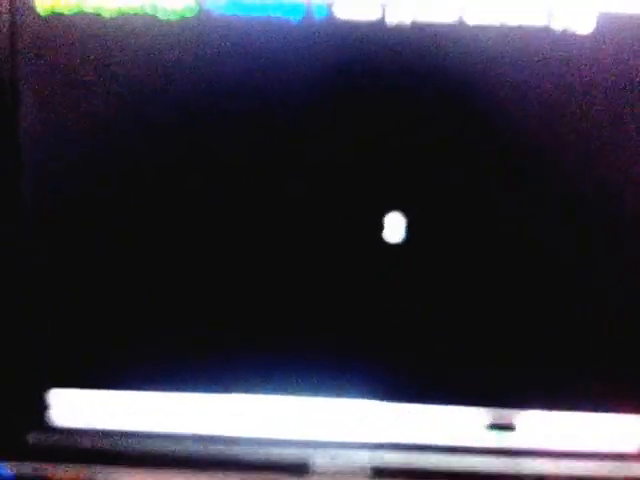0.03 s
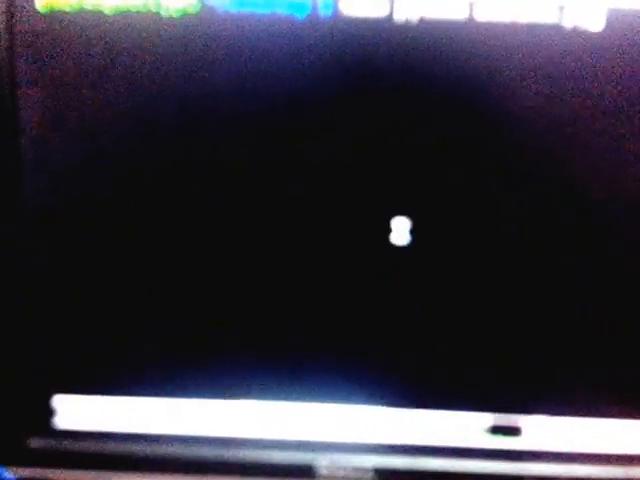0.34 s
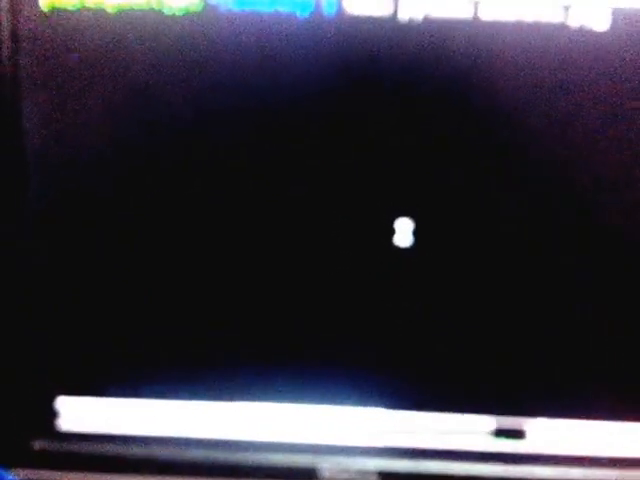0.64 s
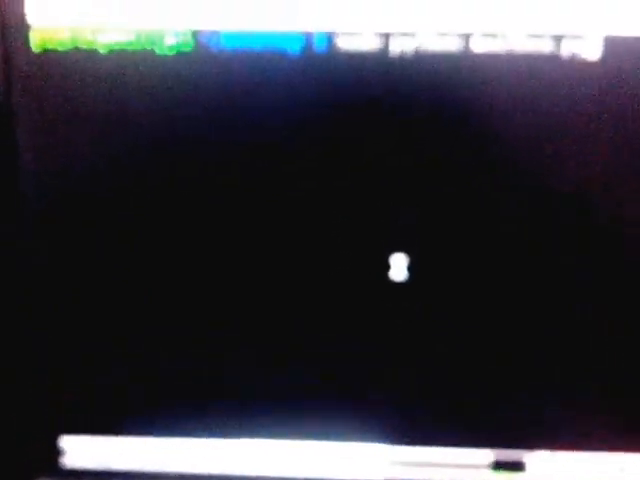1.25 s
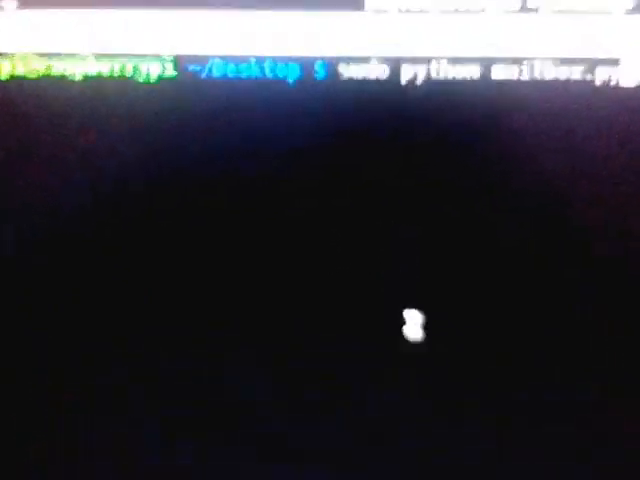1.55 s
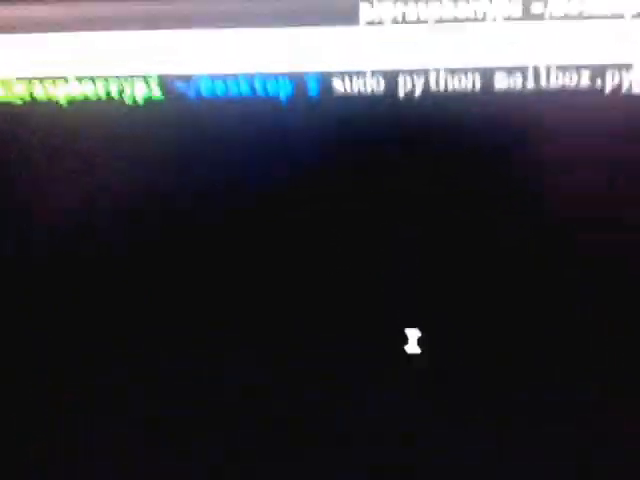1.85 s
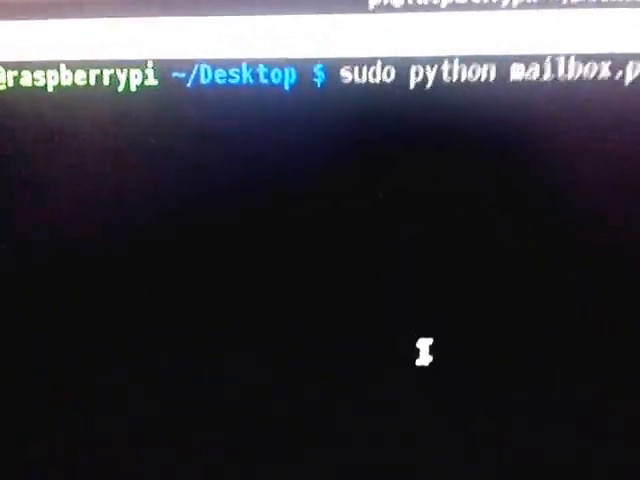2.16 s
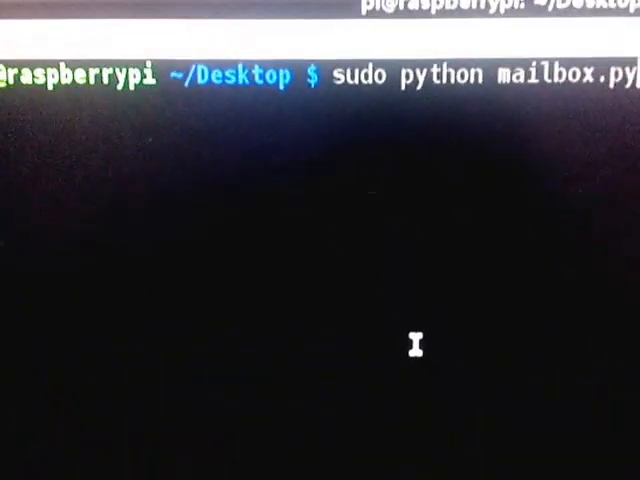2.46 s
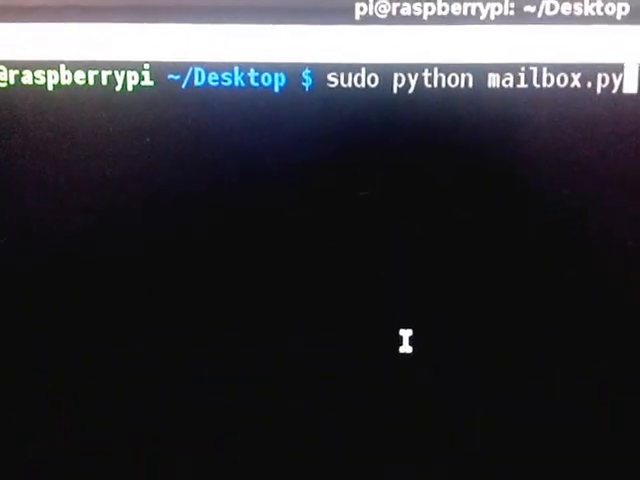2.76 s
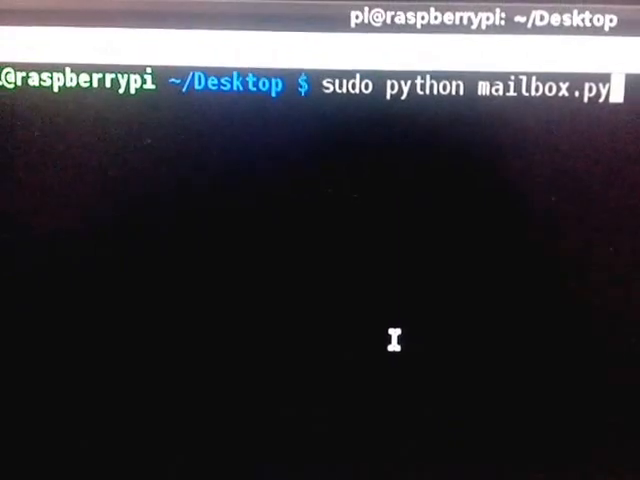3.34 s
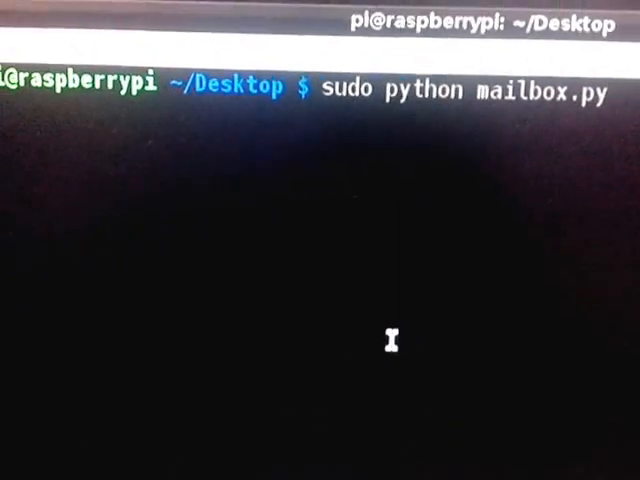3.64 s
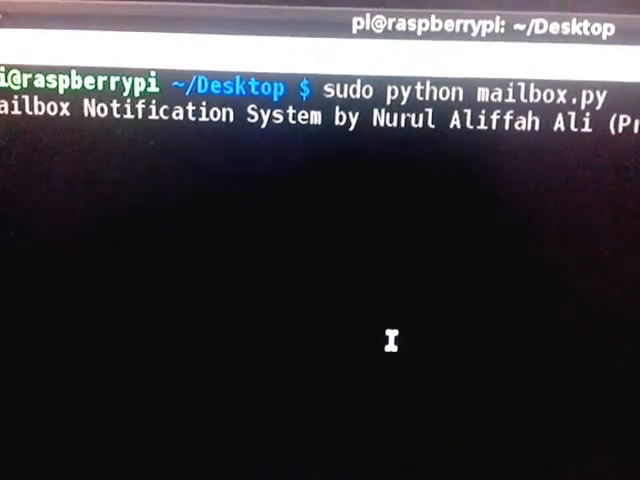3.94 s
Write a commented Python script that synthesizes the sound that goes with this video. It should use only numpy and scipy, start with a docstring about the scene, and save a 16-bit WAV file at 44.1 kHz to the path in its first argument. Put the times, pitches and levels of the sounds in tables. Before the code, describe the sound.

Hard plastic clicks twice, half a second apart, over quiet hiss and a fading hum.

```python
"""A quiet room with steady hiss, a fading appliance hum and a faint motor that slowly speeds up.
Hard plastic snaps twice at the microphones and chatters to rest, each contact exciting the case.
A soft rub leads into the second snap, a faint whistle follows; soft ticks sound farther off.
The recorder is narrow-band, ducks after each snap and clips on the loudest peaks."""
import sys
import numpy as np
from scipy import signal
from scipy.fft import rfft, irfft
from scipy.io import wavfile
from scipy.ndimage import uniform_filter1d

SR = 44100
rng = np.random.default_rng(int(sys.argv[2]) if len(sys.argv) > 2 else 0)


def master_out(mix):
    """Clip the mix to full scale and print it as 16-bit PCM to the path in sys.argv[1]."""
    frames = np.transpose(np.atleast_2d(mix))
    ceiling = np.clip(frames, -1, 1)
    pcm = np.round(ceiling * 32767).astype(np.int16)
    wavfile.write(sys.argv[1], SR, pcm)


N = 176400
T = np.arange(N) / SR
ROOM_LAG_S = .00078  # left mic late

# tick and rub spectrum per mic: f/Hz, gain/dB
TICK_EQ_LEFT = [(200, -29.5), (700, -18), (1100, 1.5), (2800, 8), (3600, 0), (4250, 12), (5400, 8),
                (6300, 4), (7200, -16.5)]
TICK_EQ_RIGHT = [(200, -25.5), (700, -17.5), (1100, 10.5), (2300, -4.5), (3500, 1.5), (4600, -2.5),
                 (6300, -1), (7200, -21)]


def amp(db):
    return 10 ** (np.asarray(db) / 20)


def unit_rms(x):
    return x / np.sqrt(np.mean(abs(x) ** 2) + 1e-20)


def at_hz(points, hz):
    f, value = np.transpose(points)
    return np.interp(np.log(hz + 1), np.log(f + 1), value)


def curve(points):
    return np.interp(T, *np.transpose(points))


def add(mix, start_s, sound):
    part = mix[max(round(start_s * SR), 0):][:len(sound)]
    part += sound[:len(part)]


def colour(x, eq, size=4096):
    """Causal filter with the given spectrum."""
    log_gain = np.log(amp(at_hz(eq, abs(np.fft.fftfreq(size, 1 / SR)))))
    taps = np.fft.ifft(np.exp(np.conj(signal.hilbert(log_gain)))).real
    return signal.fftconvolve(x, taps[:size // 2])[:N]


def tone(hz, waver=.35, rate_hz=10.0):
    """Unit-power sine at both mics, wavering in level and phase."""
    noise = rng.standard_normal(N) + 1j * rng.standard_normal(N)
    lowpass = np.exp(-(np.fft.fftfreq(N, 1 / SR) / rate_hz) ** 2)
    drift = unit_rms(np.fft.ifft(noise * lowpass))
    cycles = np.cumsum(hz * np.ones(N)) / SR + rng.random()
    wave = np.sqrt(2) * unit_rms(1 + waver * drift) * np.exp(2j * np.pi * cycles)
    return np.array([wave * np.exp(-2j * np.pi * hz * ROOM_LAG_S), wave]).real


def snaps():
    """Contacts strike a plastic case: bright crack, low knock, buzz of dense modes, brief ring."""
    # snaps and rebounds: t/s, level/dB, relative knock/dB, relative ring and buzz/dB
    contacts = [ (.7837, -24, -20, 0), (.7870, 0, 2, 0), (.7873, -4, 1, 0), (.7920, -3, -14, 0),
                (.7924, -3, -14, 0), (.7955, -7, -16, 0), (.7962, -9, -16, 0), (.7986, -8, -18, 0),
                (.7992, -17, -20, 0), (.8010, -12, -20, 0), (.8019, -14, -20, 0), (.8026, -17, -20, 0),
                (.8033, -18, -20, 0), (.8040, -13, -20, 0), (.8058, -17, -20, 0), (.8067, -16, -20, 0),
                (.8077, -19, -20, 0), (.8087, -22, -20, 0), (.8102, -23, -20, 0), (1.2371, -22, -10, -7),
                (1.2419, 0, -2, -7), (1.24226, -.5, -4, -7), (1.24268, -3, -6, -7), (1.2503, -10, -10, -7),
                (1.2514, -4, -12, -7), (1.2614, -5, -12, -7), (1.2740, -18, -20, -7)]
    # case modes: f/Hz, left/dB, right/dB, t60/s
    modes = [(4635, -68, -43, .19), (5572, -50, -64, .1)]
    # contact spectra: f/Hz, gain/dB
    crack_eq_left = [(200, -26), (1200, -25.5), (2000, -21.5), (2800, -9), (4300, -10.5), (5150, -10),
                     (5850, 5.5), (6400, 3), (7300, -20)]
    crack_eq_right = [(200, -45), (1100, -10.5), (2000, -10.5), (2900, 0), (4200, 2.5), (5400, 5),
                      (6600, 4), (7300, -4.5)]
    knock_eq = [(20, -21), (120, -8.5), (400, -12), (1400, 3), (2100, -19), (5000, -77)]
    crack_gain_db, knock_gain_db, lags_s = (11.5, 12.3), (-14, 11), (.00135, 0)  # left, right
    buzz_db, buzz_t60_s = -8, .018
    out, t = np.zeros((2, N)), T[:SR // 3]
    fade = amp(-60 * t / buzz_t60_s)
    buzz_envelope = amp(buzz_db) * fade / np.linalg.norm(fade)
    for side, crack_eq in enumerate([crack_eq_left, crack_eq_right]):
        cracks, knocks = np.zeros((2, N))
        ring = sum(amp(mic_db[side] - 60 * t / t60_s) * np.sin(2 * np.pi * hz * t)
                   for hz, *mic_db, t60_s in modes)
        for start_s, db, knock_db, ring_db in contacts:
            arrival_s = start_s + lags_s[side]
            buzz = buzz_envelope * rng.standard_normal(len(t))
            add(cracks, arrival_s, amp([db]))
            add(cracks, arrival_s, amp(db + ring_db) * buzz)
            add(knocks, arrival_s, amp([db + knock_db]))
            add(out[side], arrival_s, amp(db + ring_db) * ring)
        out[side] += amp(crack_gain_db[side]) * colour(cracks, crack_eq)
        out[side] += amp(knock_gain_db[side]) * colour(knocks, knock_eq)
    return out


def ticks():
    """Distant ticks: dense early reflections and a short room tail, doubled by a desk echo."""
    # ticks: t/s, level/dB
    events = [(.0270, -13), (0.5774, -6), (1.1371, -7.5), (1.170, -12.5), (1.5653, -14), (1.9085, -11),
              (2.7197, -19)]
    gain_db, rise_s, early_t60_s = 2.5, .0013, .045
    tail_db, tail_t60_s = -2, .25
    echo_s, echo_gain = .00203, .5
    out, t = np.zeros((2, N)), T[:SR // 3]
    decay = amp(-60 * t / early_t60_s) + amp(tail_db - 60 * t / tail_t60_s)
    envelope = np.minimum(t / rise_s, 1) * decay
    envelope /= np.linalg.norm(envelope) * np.hypot(1, echo_gain)  # unit energy with echo
    for start_s, db in events:
        for channel in out:
            tick = amp(gain_db + db) * envelope * rng.standard_normal(len(t))
            add(channel, start_s, tick)
            add(channel, start_s + echo_s, echo_gain * tick)
    return np.array([colour(out[0], TICK_EQ_LEFT), colour(out[1], TICK_EQ_RIGHT)])


def rub():
    """Faint sliding noise just before the second snap."""
    # envelope: t/s, level/dB
    level = [(1.13, -82), (1.145, -48), (1.2, -49), (1.236, -44), (1.25, -93)]
    left, right = amp(curve(level)) * rng.standard_normal((2, N))
    return np.array([colour(left, TICK_EQ_LEFT), colour(right, TICK_EQ_RIGHT)])


def hum():
    """Fading electric hum over weaker steady tones."""
    # hum envelope: t/s, level/dB
    level = [(0, -38), (.7, -39), (1.17, -39.5), (1.3, -42.5), (2, -46.5), (2.7, -50), (3.4, -53), (4, -65)]
    # steady tones: f/Hz, level/dB
    tones = [(57, -63.5), (112.6, -60), (170, -64.5), (226, -66), (337, -74.5), (396, -76), (451, -64),
             (4635, -64)]
    balance_db = [[0], [-1.35]]
    mains = tone(hz=100.3, waver=.039) * amp(curve(level)) * amp(balance_db)
    return mains + sum(amp(db) * tone(hz) for hz, db in tones)


def motor():
    """Harmonics 2 and 3 of a distant motor gaining speed."""
    # rotation rate: t/s, f/Hz
    speed = [(0, 57.5), (.7, 61.24), (1.5, 63.23), (2.2, 64.7), (3, 67.4), (4, 68.97)]
    # harmonic envelopes: t/s, level/dB
    second = [(0, -49.5), (1.15, -50.5), (1.4, -70), (1.8, -54.5), (2.25, -50.5), (2.8, -56.5),
              (3.3, -58.5), (4, -65.5)]
    third = [(0, -57), (.7, -56), (1.5, -55), (2.5, -59), (3.45, -53.5), (3.65, -48), (3.85, -62),
             (4, -61.5)]
    return sum(amp(curve(level)) * tone(harmonic * curve(speed), waver=.3)
               for harmonic, level in [(2, second), (3, third)])


def whistle():
    """Thin, slightly falling whistle after the second snap."""
    # glide: t/s, f/Hz
    pitch = [(1.4, 1743.5), (1.75, 1677.5)]
    # envelope: t/s, level/dB
    level = [(1.36, -100), (1.44, -55), (1.66, -56), (1.78, -100)]
    return amp(curve(level)) * tone(curve(pitch))


def rush():
    """Faint midrange noise that dips, swells at the second snap and dies down."""
    # spectrum: f/Hz, gain/dB
    eq = [(200, -27), (700, -5), (1450, -1), (2000, -8), (4000, -32)]
    # envelope: t/s, level/dB
    level = [(0, -43), (.7, -50.5), (1.25, -43), (2, -58), (4, -70)]
    return np.array([colour(noise, eq) for noise in rng.standard_normal((2, N))]) * amp(curve(level))


def air():
    """Room rumble common to both mics, under hiss separate in each."""
    # room noise spectra: f/Hz, gain/dB
    eq_left = [(20, -15.5), (45, -11.5), (70, 2.5), (120, 2.5), (200, 3.5), (290, -7), (550, 1),
               (1100, -1.5), (2000, -6), (3400, -8.5), (4400, -7), (5500, -1.5), (6500, -7.5), (7300, -19)]
    eq_right = [(20, -30.5), (45, -7.5), (70, -7), (120, 2.5), (200, 3), (290, -6.5), (550, -1.5),
                (1100, -3), (2000, -8), (3400, -12), (4400, -13), (5500, -11), (6500, -9.5), (7300, -19.5)]
    # slow drift: t/s, level/dB
    level = [(0, 3), (1.2, 2.5), (1.35, 0), (2.2, -0.2), (3, 0.5), (4, 2)]
    # left-right likeness: f/Hz, correlation
    likeness = [(50, 0.98), (200, 1), (550, .76), (1000, 0.16), (2000, 0.08), (7000, 0.04)]
    gain_db = -36
    hz = np.fft.rfftfreq(N, 1 / SR)
    right, separate = rfft(rng.standard_normal((2, N)))
    shared = np.clip(at_hz(likeness, hz), 0, 1)
    left = shared * right + np.sqrt(1 - shared ** 2) * separate
    left *= np.exp(-2j * np.pi * hz * ROOM_LAG_S)
    noise = irfft([left * amp(at_hz(eq_left, hz)), right * amp(at_hz(eq_right, hz))], N)
    return noise * amp(gain_db + curve(level))


def scene():
    return air() + rush() + hum() + motor() + whistle() + snaps() + ticks() + rub()


def band_limit(x, taps, cutoff_hz):
    kernel = signal.firwin(taps, cutoff_hz, window=("kaiser", 8), fs=SR)
    return signal.oaconvolve(x, kernel[None], "same")


def record(dry):
    """Voice band, gain control that ducks after peaks, clipping, final low-pass."""
    threshold_db, release_db_per_s, duck_share, delay_s = -31.5, 158, .15, .016
    x = band_limit(dry, taps=121, cutoff_hz=7480)
    power_db = 10 * np.log10(abs(uniform_filter1d((x ** 2).mean(0), size=200)) + 1e-12)
    fall_db = T * release_db_per_s
    held_db = np.maximum.accumulate(power_db + fall_db) - fall_db  # decaying peak hold
    over_db = uniform_filter1d(np.maximum(held_db - threshold_db, 0), size=600)
    duck_db = duck_share * np.interp(T - delay_s, T, over_db)
    clipped = np.clip(x * amp(-duck_db), -1, 1)
    return band_limit(clipped, taps=255, cutoff_hz=15500)


dry = scene()
out = record(dry)
master_out(out)
```